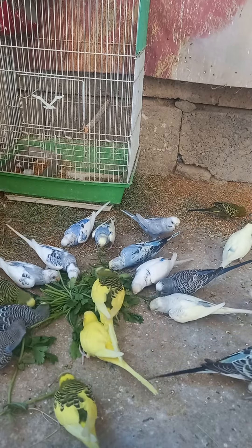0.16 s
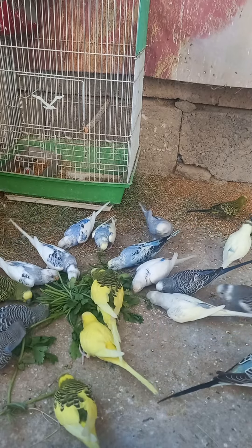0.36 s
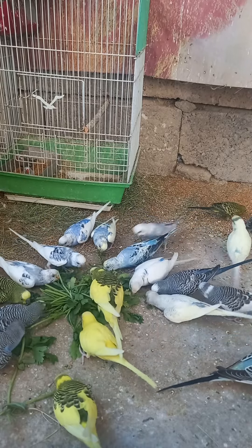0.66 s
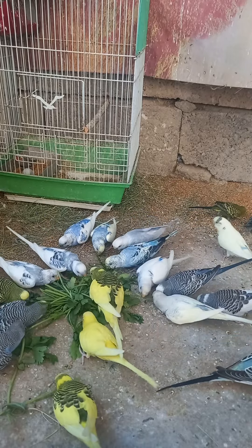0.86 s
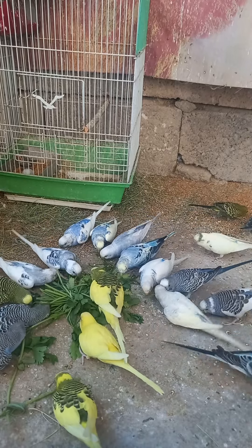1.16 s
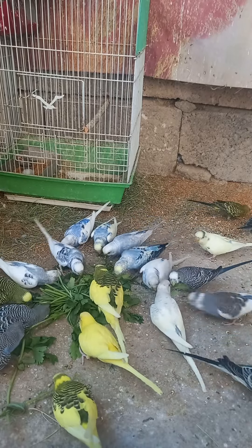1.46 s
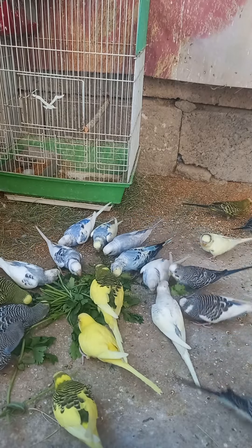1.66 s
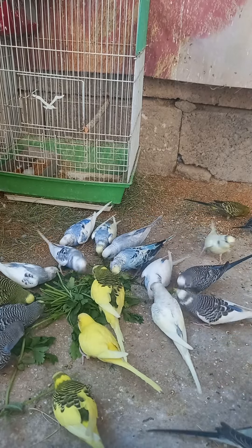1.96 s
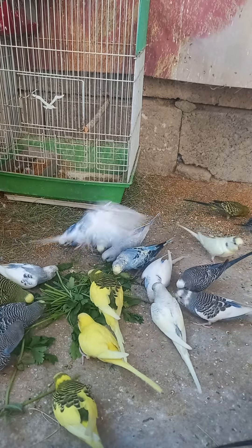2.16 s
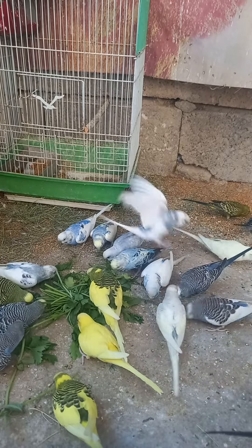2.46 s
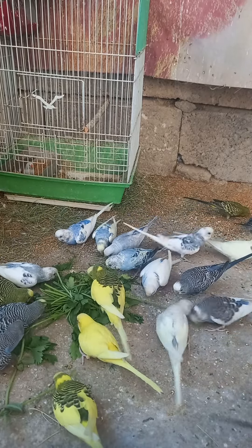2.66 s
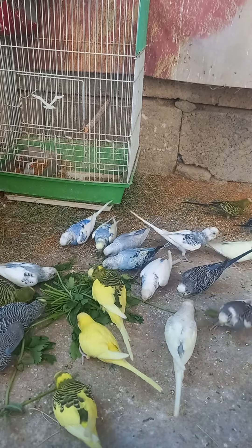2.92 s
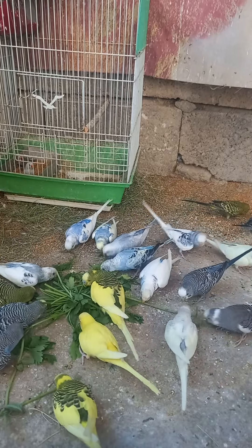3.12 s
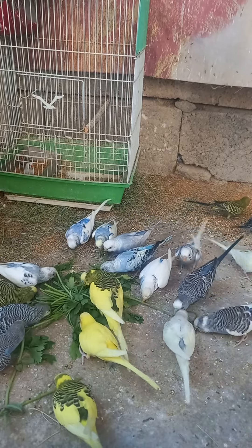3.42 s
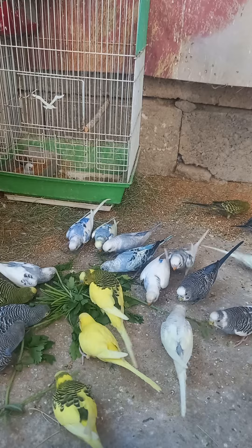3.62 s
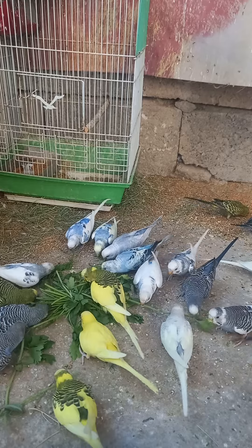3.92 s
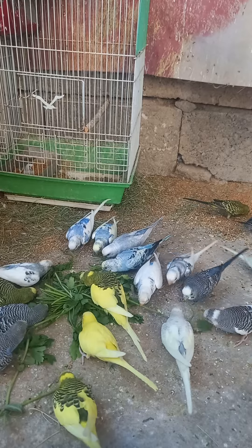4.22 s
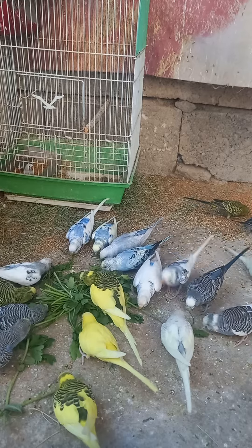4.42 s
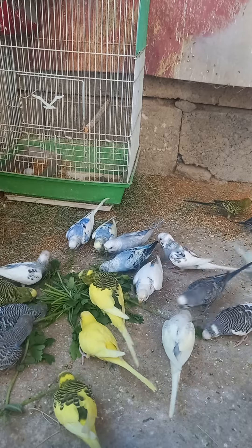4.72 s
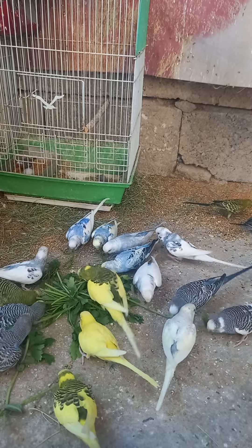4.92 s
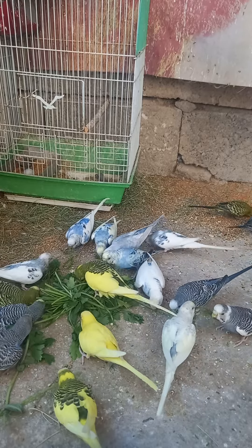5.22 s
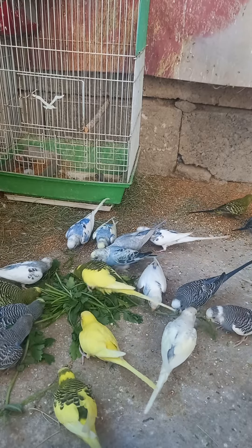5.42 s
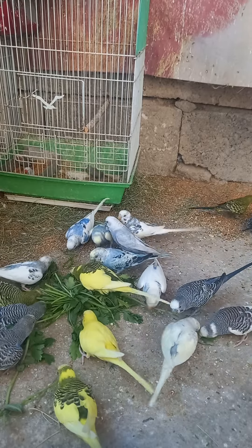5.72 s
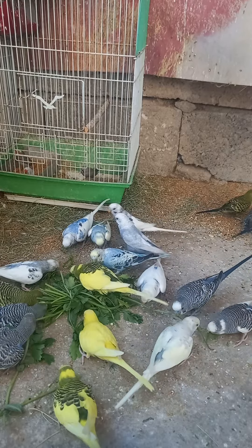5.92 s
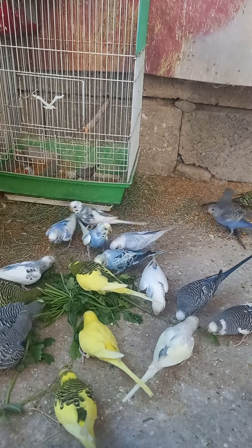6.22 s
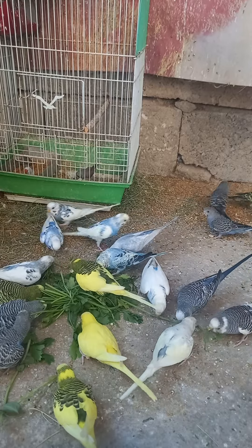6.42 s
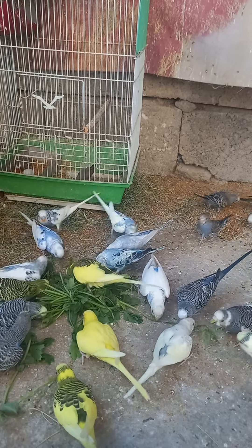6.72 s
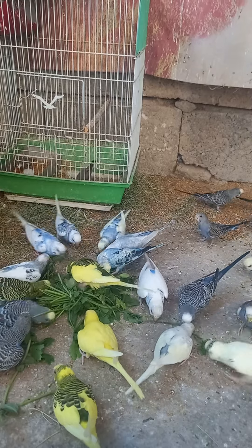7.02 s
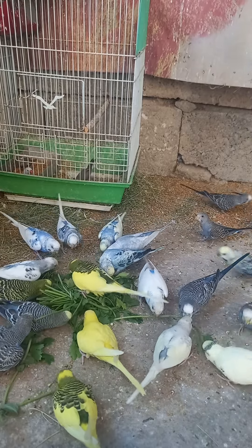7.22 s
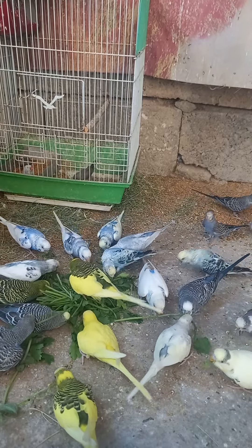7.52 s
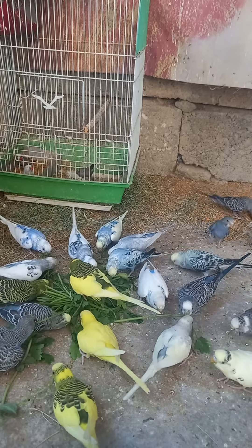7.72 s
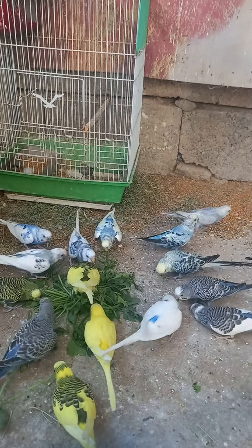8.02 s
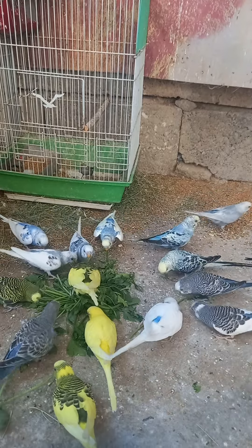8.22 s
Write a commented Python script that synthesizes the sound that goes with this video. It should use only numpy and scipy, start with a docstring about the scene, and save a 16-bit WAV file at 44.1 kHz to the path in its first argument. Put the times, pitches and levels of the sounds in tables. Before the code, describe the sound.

A flock of small parrots chatters with quick warbles and sharp chirps, with light pecking clicks and a faint rumble behind.

```python
"""Budgerigars feeding in a yard

One bird repeats a quick four-loop warble; others cut in with loud falling chirps and raspy squeaks.
Each call is a gliding whistle from the bird's voice organ, echoed by the yard's walls. Beaks crack seed
husks and nibble greens, feet and wings scuff the ground, and a far machine hums under the town's rumble."""
import sys
import numpy as np
from scipy import signal
from scipy.fft import rfft, irfft, next_fast_len
from scipy.io import wavfile

SR = 44100
rng = np.random.default_rng(int(sys.argv[2]) if len(sys.argv) > 2 else 0)


def to_wav(sig):
    """Store sig (one row per channel, or 1-D mono) as 16-bit WAV at the path in sys.argv[1].

    Samples outside -1..1 are clipped; the rate is SR.
    """
    pcm = np.clip(np.atleast_2d(sig), -1, 1) * 32767
    pcm = np.round(pcm).astype(np.int16)
    wavfile.write(sys.argv[1], SR, pcm.T)  # frames by channels


N = 369116

# How two kinds of call pass through the throat. Each row: overtone in Hz, dB relative to the main tone.
WARBLE_OVERTONES = [(4400, 9), (5200, -10.5), (6200, -10), (7500, -21), (9000, -22), (10800, -32),
                    (13000, -19.5), (16000, -36)]
CHIRP_OVERTONES = [(4400, -22), (6000, -27), (7500, -26), (9200, -29), (11000, -38), (13000, -32),
                   (14300, -18), (16000, -18)]
# The bright sound of a snapping husk. Each row: frequency in Hz, relative level in dB.
HUSK_SPECTRUM = [(1500, -22), (4000, -7), (7500, -3), (10500, -6), (13000, -2), (15500, 0)]


def warbler():
    """One bird, a little farther off, repeats a phrase of high pips between rising scoops."""
    # Each row: start in seconds within the phrase, first and last pitch in Hz, level in dB.
    notes = [(0, 4750, 5300, -1.5), (.017, 3150, 3050, -2), (.031, 4400, 4300, 4), (.043, 3450, 4200, 1),
             (.067, 2430, 4050, 0), (.123, 2230, 2250, -1), (.139, 4450, 3750, 2), (.155, 3000, 3900, 0),
             (.185, 2200, 3800, -2), (.238, 2200, 2220, -4), (.253, 4300, 3900, -2)]
    # Each row: start in seconds, level in dB, left minus right in dB, pitch ratio, length ratio,
    # seconds left silent at the start.
    repeats = [(.069, -30, -4.5, 1.02, 1, 0), (.555, -29, -3.5, 1.015, 1.005, 0),
               (1.125, -28, -1.5, .98, .96, 0), (1.626, -29, -2, .98, 1, 0),
               (2.153, -30, -2.5, .96, .96, 0), (2.896, -30, -2, .99, 1.01, 0),
               (3.636, -32, -4, 1.01, .97, 0), (4.250, -33, -4.5, 1, 1, 0), (5.924, -36, -3, .98, .96, 0),
               (7.437, -30, -4, .98, .94, .042), (8.026, -31.5, -6, 1.026, .98, .045)]
    out = np.zeros((2, N))
    shape = phrase(notes, length_s=.277, first_rasp=.25, last_rasp=.2, weak_db_per_hz=.016)
    for start, db, pan_db, pitch, stretch, skip_s in repeats:
        song = syrinx(shape, WARBLE_OVERTONES, pitch, stretch, skip_s, jitter=.26, breath_db=-7)
        heard = yard(song, tail_db=-6, wall_db=-10, wall_s=.010, right_lag_s=.00039)
        add(out, from_db(db) * heard, start, pan_db)
    return out


def chirps():
    """Loud calls that step down in pitch, then turn up and grow hoarse."""
    # Each row: start in seconds within the call, first and last pitch in Hz, level in dB.
    notes = [(.004, 3850, 3400, 0), (.029, 3080, 2980, -2.5), (.056, 2300, 3100, -7),
             (.108, 3200, 3450, -8)]
    # Each row: start in seconds, level in dB, left minus right in dB, pitch ratio, length ratio.
    events = [(.972, -26, 1.5, .92, 1.11), (1.122, -28, -4, .95, 1.2), (3.214, -18, -2.5, .99, 1.01),
              (4.903, -18, 3, 1.01, 0.85), (6.112, -35, -4, .96, .95), (6.489, -29, 6, .92, .95),
              (6.574, -18, 2.5, .975, 1), (7.444, -19.5, -3, 1.02, 0.95)]
    shape = phrase(notes, length_s=.129, first_rasp=.07, last_rasp=.85, weak_db_per_hz=.005)
    return calls(events, shape, CHIRP_OVERTONES, jitter=.22, breath_db=-12, tail_db=-9)


def short_calls():
    """One-note calls: falling peeps, rising yips, high squeaks and breathy rasps."""
    # Each row: seconds into the call, pitch in Hz, level in dB, rasp from 0 (clear) to 1 (hoarse).
    peep = [(0, 3552, -4, 0.66), (.007, 3270, 7.5, 0.17), (.018, 3100, -17.5, .25),
            (0.035, 3053, -10, 0.97)]
    yip = [(0, 3400, -10, .3), (.004, 3530, -5, .1), (.022, 3770, -4, .1), (.034, 3940, -8, .24)]
    squeak = [(0, 6490, -35, 1), (.006, 4870, -2, 0.36), (0.017, 4650, -23, .6), (0.031, 4120, -22, 1)]
    rasp = [(0, 4495, 0, 0.67), (.010, 5600, -5, 0.75), (0.023, 5400, -2.5, 1), (.045, 4850, -1, 0.75)]
    # Each row: start in seconds, level in dB, left minus right in dB, pitch ratio, length ratio.
    peeps = [(.172, -29, -4, 1.18, 1.1), (.772, -33, -8, 1.5, 0.54), (.810, -33, 0, 1.18, 1.11),
             (.858, -23, -1, 0.94, 1.17), (.895, -35, -1, 1.02, 0.61), (.926, -27.5, -0.5, 1, 1.3),
             (1.076, -29.5, -7.5, .84, 0.88)]
    yips = [(.112, -35, -4, 1.02, .8), (8.068, -31.5, -6, 1, 1)]
    squeaks = [(.935, -26.5, -0.5, .95, 2.1), (1.079, -23, -1, 0.8, 2.5), (3.176, -25.5, -0.5, 0.96, 1.5),
               (4.232, -24.5, 0, 1, 0.75), (4.868, -19, -0.5, 1.08, 1.1), (6.452, -30, 0, .92, 1.3),
               (6.530, -18, 0, 1.06, 1), (7.412, -23, -1, 0.98, 1.27)]
    rasps = [(1.160, -33.5, -1, 1.37, 1.1), (1.355, -33.5, -1, 1.22, 0.64), (4.315, -32.5, 0, 1.05, 0.56),
             (4.400, -32.5, 0, 0.92, 0.75), (4.948, -28.5, 1, .98, 0.91), (7.515, -28, -1, 0.92, 1.2)]
    # The throat in a yip. Each row: overtone in Hz, dB relative to the main tone.
    yip_overtones = [(6000, -9), (7500, 3), (9000, -20), (11000, -24), (16000, -26)]
    return (calls(peeps, peep, CHIRP_OVERTONES, jitter=.24, breath_db=-9, tail_db=-5)
            + calls(yips, yip, yip_overtones, jitter=.097, breath_db=-8)
            + calls(squeaks, squeak, WARBLE_OVERTONES, jitter=.18, breath_db=-2.5)
            + calls(rasps, rasp, WARBLE_OVERTONES, jitter=.2, breath_db=-6))


def calls(events, shape, throat, jitter, breath_db, tail_db=-8):
    """One kind of call from nearby birds, each at its own pitch and pace."""
    out = np.zeros((2, N))
    for start, db, pan_db, pitch, stretch in events:
        call = syrinx(shape, throat, pitch, stretch, jitter=jitter, breath_db=breath_db)
        heard = yard(call, tail_db, wall_db=-15, right_lag_s=.0005)
        add(out, from_db(db) * heard, start, pan_db)
    return out


def phrase(notes, length_s, first_rasp, last_rasp, weak_db_per_hz, leap_s=.003, full_voice_hz=3000):
    """Join notes into one call shape: each swells, holds its pitch, then bends away. Low ones are weak."""
    # The rasp changes between these two fractions of the call's length.
    rasp_turn = [.33, .68]
    ends = [note[0] for note in notes[1:]] + [length_s]
    progress = np.linspace(0, 1, 17)
    shape = []
    for (start, from_hz, to_hz, db), end in zip(notes, ends):
        times = start + progress * (end - start - leap_s)
        hz = from_hz + (to_hz - from_hz) * progress ** 2
        edge_db = 7 * np.abs(2 * progress - 1) ** 3   # a flat top with weaker ends
        thin_db = weak_db_per_hz * np.maximum(full_voice_hz - hz, 0)
        rasp = np.interp(times / length_s, rasp_turn, [first_rasp, last_rasp])
        shape.extend(zip(times, hz, db - edge_db - thin_db, rasp))
    return shape


def syrinx(shape, throat, pitch, stretch, skip_s=0, *, jitter, breath_db):
    """The bird's voice organ whistles; rasp shakes its pitch and strength and lets air through."""
    # The open beak favours some pitches. Each row: frequency in Hz, boost in dB.
    beak_boost = [(2200, -0.5), (2900, 1.5), (3600, 1.5), (4300, 1.5), (5300, 1)]
    # The hiss of that air. Each row: frequency in Hz, relative level in dB.
    breath_spectrum = [(1200, -16), (2300, 11), (3500, 6), (5200, -6), (6300, -4), (7500, 1), (10500, -7.5),
                       (14500, -2), (16500, -53)]
    flutter, drift, blur = .53, .01254, .34   # random sway of strength, pitch and overtone phase
    times, *columns = np.transpose(shape)
    t = np.arange(int(times[-1] * stretch * SR)) / SR
    hz, db, rasp = [np.interp(t / stretch, np.sort(times), column) for column in columns]
    db = db + at_hz(beak_boost, hz * pitch)
    hz = hz * pitch * (1 + drift * wobble(t, 88.1) + jitter * rasp * np.tanh(wobble(t, 1400)))
    phase = 2 * np.pi * np.cumsum(hz) / SR
    tone = np.sin(phase)
    for k in range(2, 7):
        overtone = np.sin(k * phase + blur * (k - 1) * wobble(t, 1100))
        tone += (k * hz < SR / 2) * from_db(at_hz(throat, k * hz)) * overtone
    strength = (1 + flutter * rasp * wobble(t, 700)) / np.hypot(1, flutter * rasp)
    accent = from_db(2.2 * np.minimum(rasp / .15, 1) * wobble(t, 110))
    air = from_db(breath_db) * rasp * coloured(breath_spectrum, len(t))
    fade = np.clip(np.minimum(t - skip_s, t[-1] - t) / .002, 0, 1)
    return fade * accent * from_db(db) * (np.sqrt(2) * tone * strength + air)


def husk_cracks(gain_db=-8, decay_s=.0012):
    """Beaks snap seed husks: bursts of noise that die almost at once."""
    # Each row: start in seconds, relative level in dB.
    cracks = [(0.866, -23), (2.521, -15.5), (2.862, -25), (3.6007, -38), (4.0322, -28), (4.1046, -24),
              (4.175, -21), (5.1856, -20), (5.3294, -25), (5.47, -27), (6.98, -29), (7.8153, -23.5),
              (7.9897, -24)]
    out = np.zeros((2, N))
    t = np.arange(512) / SR
    for start, db in cracks:
        snap = from_db(db + gain_db) * coloured(HUSK_SPECTRUM, len(t)) * np.exp(-t / decay_s)
        add(out, yard(snap, tail_db=-6, wall_db=-16), start, pan_db=rng.normal(0, 3))
    return out


def nibbling(level_db=-59, grains_per_s=70, spread_db=12.5, decay_s=.0012):
    """Many beaks tug at the greens: a fine crackle that comes in flurries."""
    sizes = from_db(spread_db * np.minimum(rng.exponential(1, N), 3))
    busy = from_db(3.9 * wobble(np.arange(N) / SR, 6.8))
    clicks = sizes * (rng.random(N) < busy * grains_per_s / SR)
    grains = signal.lfilter([1], [1, -np.exp(-1 / (decay_s * SR))], clicks + 1e-18)   # each click fades
    crackle = np.array([grains * coloured(HUSK_SPECTRUM, N) for side in range(2)])
    return from_db(level_db) * rms_one(crackle)


def scuffs():
    """Feet and wings brush the ground in short, soft swishes."""
    # Each row: start in seconds, level in dB, length in seconds.
    events = [(.852, -47, 0.022), (1.465, -41, 0.013), (1.523, -41.5, 0.02), (7.248, -37.5, 0.025),
              (7.327, -41.5, 0.025)]
    # Each row: frequency in Hz, relative level in dB.
    swish_spectrum = [(300, -14), (1200, 3), (2700, 5), (5000, -4), (9000, -15.5), (16000, -27)]
    out = np.zeros((2, N))
    for start, db, length_s in events:
        size = int(length_s * SR)
        swish = from_db(db) * np.hanning(size) * coloured(swish_spectrum, size)
        add(out, yard(swish, tail_db=.5, wall_db=-11), start)
    return out


def town(town_db=-38.5, bass_hz=400):
    """Distant rumble and a machine's hum, made of narrow, wavering bands of noise."""
    # The town's noise. Each row: frequency in Hz, relative level in dB.
    town_spectrum = [(18, -48), (32, -25), (48, -2), (75, -10), (170, -12.5), (280, -10), (550, -13),
                     (950, -12.5), (1600, -20.5), (2200, -25), (3200, -25.5), (6000, -36), (10500, -38.5),
                     (16000, -36.5)]
    # The machine. Each row: centre in Hz, half-width in Hz, level in dB.
    hum_bands = [(67.9, 11.8, -41.5), (114.4, 7.9, -44), (140.3, 10, -47.5), (220.3, 31, -45),
                 (460.7, 20, -47.5), (770, 13, -57.5), (2110, 120, -50.5)]
    # The bass swells and sinks. Each row: time in seconds, change in dB.
    bass_swell = [(0, -.3), (2.8, -.3), (3.2, 1.6), (3.7, -1.8), (4.3, -2.4), (4.75, 1.6), (5.7, -.7),
                  (6.2, .6), (8.37, -.4)]
    # Each row: frequency in Hz, how alike left and right are from 0 to 1.
    likeness = [(60, 1), (130, 0.84), (290, 0.51), (640, 0.66), (1400, 0.16), (3100, 0.74), (7000, 0.13),
                (15000, 0.1)]
    # Each row: frequency in Hz, left minus right in dB.
    lean = [(60, -0.5), (130, 2), (290, 5.5), (640, 0.5), (1410, -2), (3100, 0), (6820, -2), (15000, 1.5)]
    # Each row: frequency in Hz, how far the left wave runs ahead in radians.
    left_lead = [(300, 0), (780, 1.1), (1300, 2.5), (2000, 5.5), (4650, 12), (8000, 24), (15000, 40)]
    size = next_fast_len(N, real=True)
    hz = np.fft.rfftfreq(size, 1 / SR)
    bands = [(town_db, from_db(at_hz(town_spectrum, hz)))]
    bands += [(db, 1 / (1 + ((hz - centre) / width) ** 2)) for centre, width, db in hum_bands]
    gain = np.sqrt(sum((from_db(db) * rms_one(band)) ** 2 for db, band in bands))
    common, opposed = rfft(rng.standard_normal((2, size)))
    alike = np.clip(at_hz(likeness, hz), 0, .99)
    sides = np.array([[1], [-1]])
    noise = (np.sqrt(1 + alike) * common + np.sqrt(1 - alike) * opposed * sides) / np.sqrt(2)
    noise *= gain * from_db(sides * at_hz(lean, hz) / 2)
    noise *= np.exp(.5j * sides * at_hz(left_lead, hz))
    bass = 1 / (1 + (hz / bass_hz) ** 4)
    times, swell_db = np.transpose(bass_swell)
    swell = from_db(np.interp(np.arange(N) / SR, times, swell_db))
    return swell * irfft(noise * bass, size)[:, :N] + irfft(noise * (1 - bass), size)[:, :N]


def yard(dry, tail_db, wall_db, wall_s=.0179, right_lag_s=.00023, ring_s=.115):
    """Sound reaches the left side first; the wall throws it back, then scattered echoes die away."""
    t = np.arange(SR // 3) / SR
    scatter = rng.standard_normal((2, len(t))) * (t > .002)
    soften = signal.butter(1, 8000, fs=SR, output="sos")
    tail = signal.sosfilt(soften, scatter * from_db(-60 * t / ring_s))
    wall = rng.standard_normal((2, len(t))) * np.exp(-((t - wall_s) / .009) ** 2)
    echoes = sum(from_db(db) * echo / np.linalg.norm(echo, axis=1, keepdims=True)
                 for db, echo in [(tail_db, tail), (wall_db, wall)])
    echoes[0, 0] += 1   # the direct sound
    echoes[1, round(right_lag_s * SR)] += 1
    return signal.fftconvolve(dry[None], echoes, axes=1)


def from_db(db):
    """Turn decibels into a gain."""
    return 10 ** (np.asarray(db) / 20)


def rms_one(x):
    """Scale to an average power of one."""
    return x / np.sqrt(np.mean(x ** 2) + 1e-20)


def at_hz(points, hz):
    """Read between a table's rows on a log-frequency axis."""
    known_hz, values = np.transpose(points)
    return np.interp(np.log(np.maximum(hz, 1)), np.log(known_hz), values)


def coloured(spectrum, size):
    """Noise with the given spectrum."""
    padded = next_fast_len(size, real=True)
    gain = from_db(at_hz(spectrum, np.fft.rfftfreq(padded, 1 / SR)))
    return rms_one(irfft(rfft(rng.standard_normal(padded)) * gain, padded)[:size])


def wobble(t, per_s):
    """Glide to a new random value per_s times a second."""
    knots = rng.standard_normal(1024)
    return np.interp(t * per_s, np.arange(len(knots)), knots)


def add(out, sound, start_s, pan_db=0):
    """Mix in a stereo sound; a positive pan_db leans it left."""
    i = max(0, round(start_s * SR))
    part = sound[:, :max(0, N - i)]
    out[:, i:i + part.shape[1]] += from_db([[pan_db / 2], [-pan_db / 2]]) * part


def scene():
    """Calls and feeding sounds over the town."""
    flock = chirps() + short_calls() + warbler()
    return flock + husk_cracks() + nibbling() + scuffs() + town()


def record(dry, bass_cut_hz=29, treble_cut_hz=16000):
    """The deepest bass rolls off; the top is cut steeply."""
    thinned = signal.sosfilt(signal.butter(4, bass_cut_hz, "high", fs=SR, output="sos"), dry)
    return signal.sosfilt(signal.ellip(10, .1, 80, treble_cut_hz, fs=SR, output="sos"), thinned)


dry = scene()
out = record(dry)
to_wav(out)
```